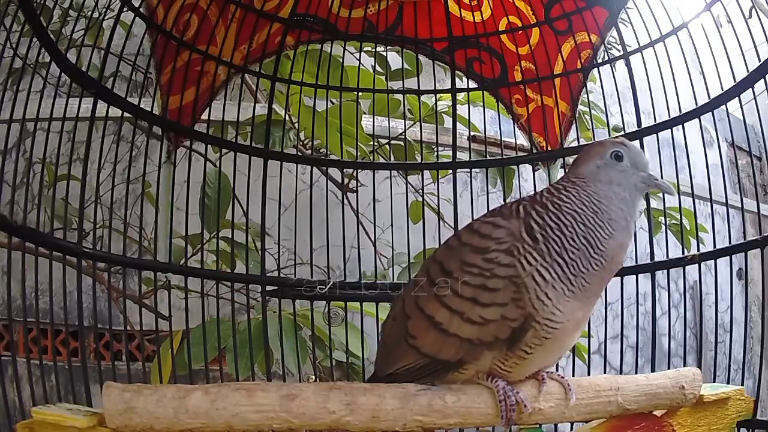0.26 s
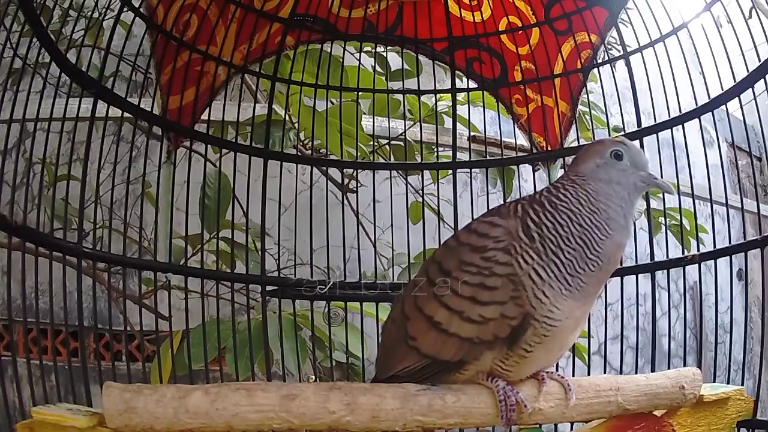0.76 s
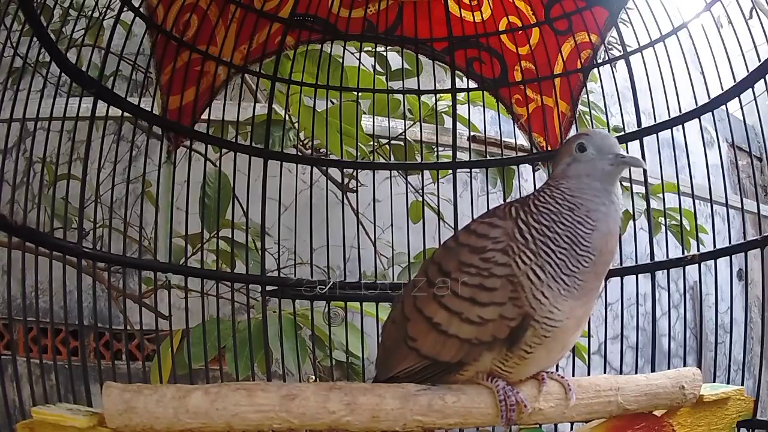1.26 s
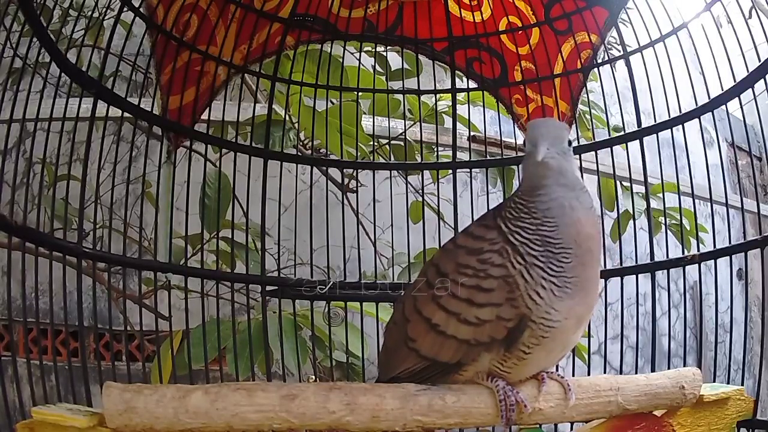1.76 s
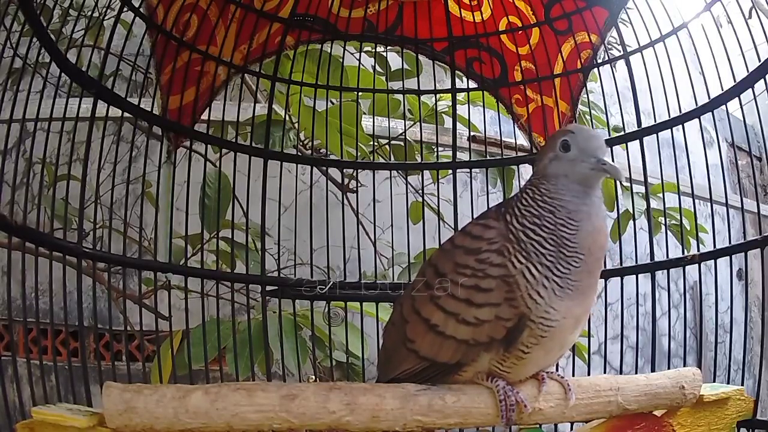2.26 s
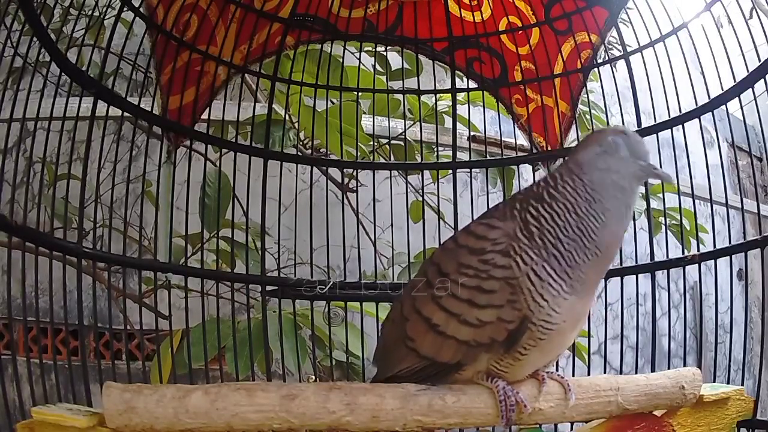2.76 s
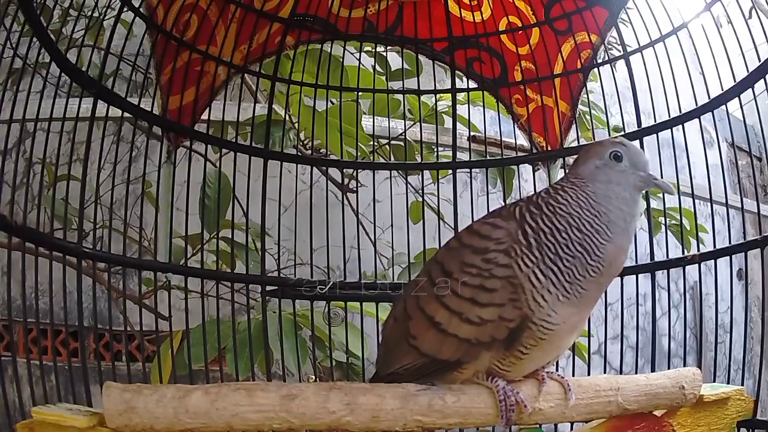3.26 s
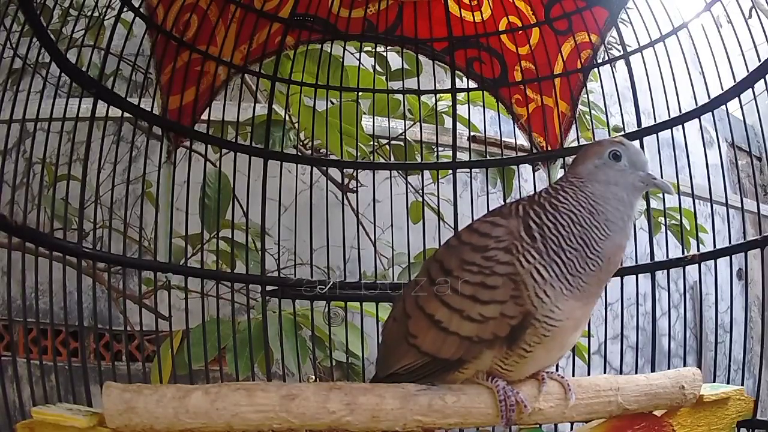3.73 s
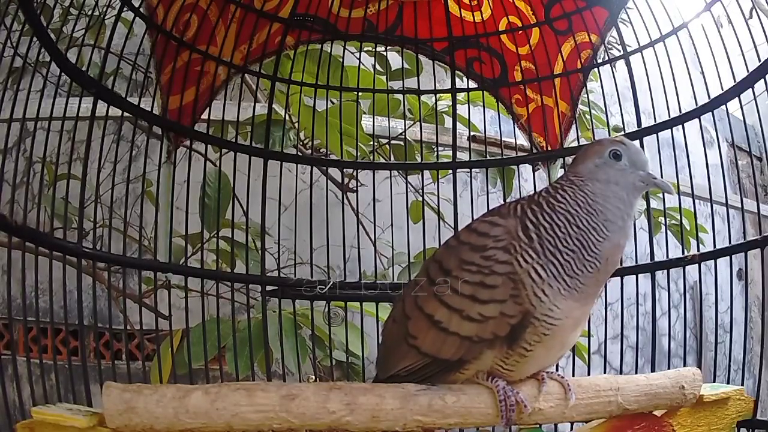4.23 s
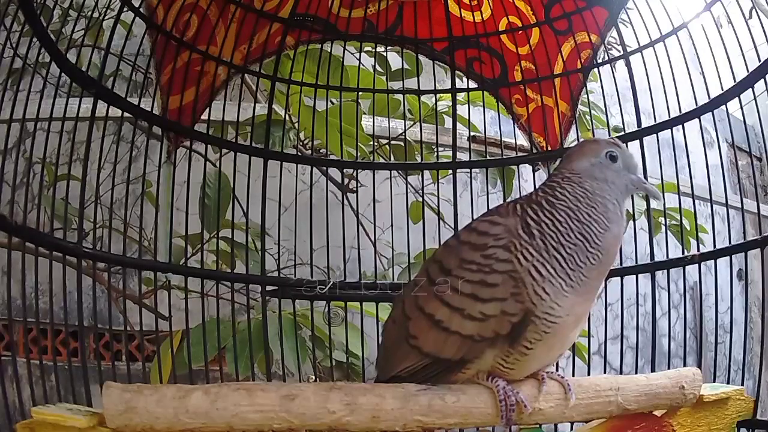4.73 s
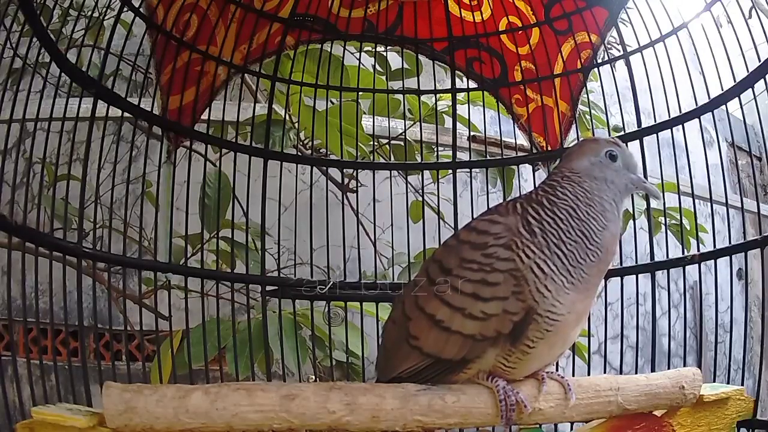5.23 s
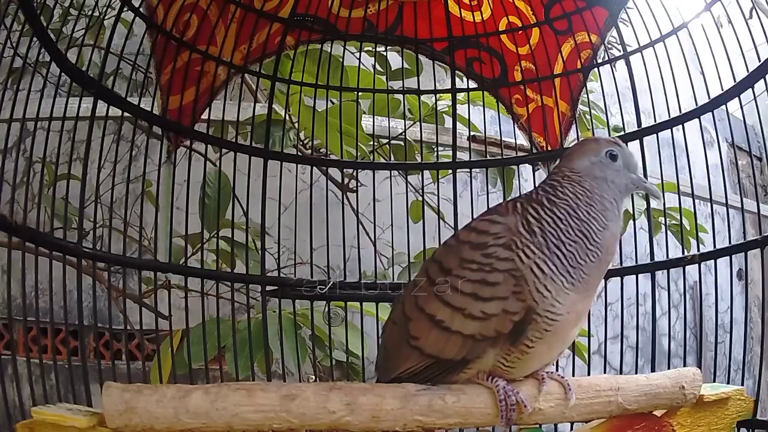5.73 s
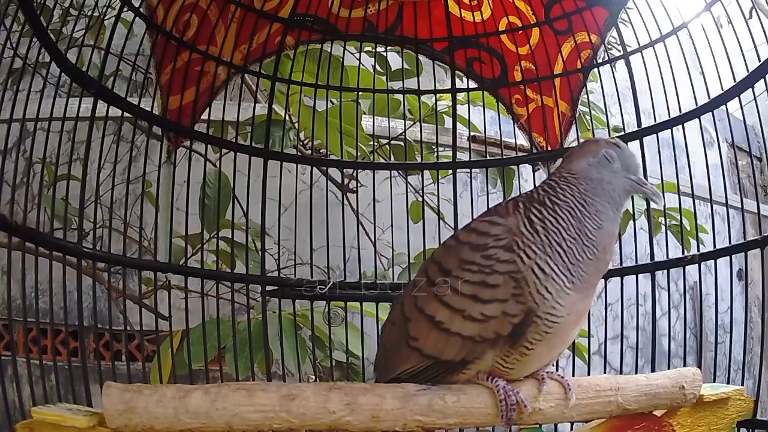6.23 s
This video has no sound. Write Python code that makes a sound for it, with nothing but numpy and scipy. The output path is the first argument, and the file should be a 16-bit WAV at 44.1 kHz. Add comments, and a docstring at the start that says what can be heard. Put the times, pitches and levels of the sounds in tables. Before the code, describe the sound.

A neighbouring dove coos quickly at once in a walled yard, over soft distant traffic. A sparrow gives thin buzzing chirps, and a purring trill breaks into slowing, sinking hoots. Then a close dove sings one loud phrase of six short, rounded whistles. Fainter doves answer, the trill rolls again more quietly, and the neighbour starts another note at the end. The near bird is loud and clear, close to the microphone, with faint wall echoes.

```python
"""Traffic drones and a neighbouring dove coos at once; a sparrow chirps, then a slowing trill rolls twice.
A near dove coos one loud phrase between the yard walls; a far dove answers.
Doves: creak pulses, a low gulp, then an arched whistle. Trill: pulsed purr and breath, then sine hoots.
Sparrow: three buzzing or fluttering sines, a thin high lead-in, an upper voice and a lower one.
Traffic: wavering noise bands plus engine tones. Each bird gets wall echoes and a diffuse noise tail."""
import sys
import numpy as np
from scipy import signal
from scipy.io import wavfile

SR = 44100
rng = np.random.default_rng(int(sys.argv[2]) if len(sys.argv) > 2 else 0)


def waveform_to_disk(signal):
    """Save audio, clipped to [-1, 1], as 16-bit WAV at the path in sys.argv[1]."""
    frames = np.transpose(np.atleast_2d(signal))
    scaled = np.clip(frames, -1, 1) * 32767
    samples = np.round(scaled).astype(np.int16)
    wavfile.write(sys.argv[1], SR, samples)


N = 286209

# Traffic noise spectrum, relative: (frequency [Hz], density [dB per Hz])
TRAFFIC_SPECTRUM = [(13, -42), (22, -15), (79, -12.5), (119, 1), (170, -17.5), (200, -6), (236, -20.5),
                    (285, -10), (374, -18.5), (740, -28), (972, -25), (1420, -39), (2200, -46), (4350, -59),
                    (14800, -60)]
# Stereo width of the traffic: (frequency [Hz], side over mid [dB])
TRAFFIC_WIDTH = [(60, -33), (180, -28.5), (540, -19.5), (1610, -8.5), (4810, -4), (14400, -11)]
# Two passing engines: (time [s], tone [Hz], level [dB])
PASSING_ENGINES = [
    [(0.4, 118, -47.5), (0.55, 134.8, -41.5), (0.8, 124, -41.5), (1.6, 116, -42), (2.7, 116.3, -43.5),
     (3.3, 126.9, -48.5)],
    [(4.2, 176.8, -42), (4.7, 190, -50), (5.05, 193.8, -42), (6.49, 210.6, -46)],
]
# Heavy engine slowing down: (time [s], firing rate [Hz], level [dB])
IDLING_ENGINE = [(3.2, 41.52, -51.5), (3.5, 40.2, -38.5), (4.7, 38.98, -39), (5.9, 35.1, -42),
                 (6.49, 34.39, -49)]
# Multiples 1, 2, 3 of the firing rate: (level [dB])
IDLING_ORDERS_DB = [-10, -6.5, -0.5]
TRAFFIC_DB = -41

# Yard as heard from each singer: echoes (lag [s], level [dB]),
# then diffuse tail (level [dB], build-up start [s], low t60 [s], high t60 [s], side level [dB])
NEAR_YARD = ([(.012, -20.5), (.045, -25), (.066, -28.5), (.105, -26.5), (.142, -28.5)],
              (-13.5, 0.08, 0.75, 0.27, -23.5))
NEIGHBOUR_YARD = ([(.007, 2.5), (.022, -7), (.035, -4)], (3.5, -0.52, 0.5, 0.27, -24.5))
TRILL_YARD = ([(.0125, -12.5), (.018, -2.5), (.0262, -4.5), (.0305, -5.5), (.037, -8.5), (.0435, -10.5),
               (.047, -6), (.055, -10.5), (.075, -10.5)], (-0.5, -0.33, 0.8, .5, -20))
FAR_YARD = ([(.011, -4), (.024, 0), (.041, -5)], (7.5, 0.07, 0.74, 0, -30.5))
SPARROW_YARD = ([(.009, -4), (.021, -8)], (4.5, -0.1, 0.82, 0.34, -5))
TAIL_SPLIT_HZ = 1230   # low t60 below, high t60 above

# Sparrow chirps: (start [s], peak [dB], upper voice [Hz], lower voice [Hz], length [s],
# lower voice [dB], lead-in [dB], settled buzz swing [Hz])
CHIRPS = [(0.584, -60, 4980, 4130, 0.08, 2, -19, 330), (0.764, -72, 4410, 3590, 0.068, -3, -20, 250),
          (1.353, -60, 4930, 3975, 0.079, 1.5, -12, 323), (2.233, -60, 4980, 4020, 0.084, 0, -14, 330),
          (3.512, -57.5, 4740, 3890, 0.091, 0.5, -18, 329), (3.876, -71, 4380, 3680, 0.063, 2, -20, 300),
          (4.455, -56.5, 4750, 3950, .095, 2.5, -18, 280), (5.393, -57.5, 4880, 3970, 0.094, 1, -21, 330.4),
          (6.22, -73, 4590, 3750, 0.045, 3, -20, 305)]
# Course of each chirp voice: (share of the length [1], pitch ratio [1], level [dB])
LEAD_IN = [(-.05, 1.44, -20), (.08, 1.4, 0), (.28, 1.36, -3), (.45, 1.3, -20)]
UPPER_VOICE = [(-.1, 1.12, -30), (.1, 1.04, -11), (.3, 1.01, 0), (.62, .98, 0), (.74, .94, -25)]
LOWER_VOICE = [(.46, 1.08, -25), (.58, 1.01, 2), (.78, .98, 0), (1.0, .89, -18)]
BUZZ_PER_S, FLUTTER_HZ = 480, 210

# Trills: (start [s], level of the purr [dB], hoot pitch [Hz], pitch sags from [s])
TRILLS = [(1.04, -5, 1020, 1.85), (5.008, -6.5, 973, 5.94)]
# Purr opening a trill: (time after start [s], hoot [dB], rasp in each of four bands [dB])
PURR = [(.015, -42.5, -71, -68, -63, -80.5), (.04, -31, -49, -44.5, -51, -75.5),
        (.11, -20, -47, -45.5, -47.5, -72), (.19, -12.5, -49, -48, -57, -59.5),
        (.27, -10.5, -54, -50, -55, -64), (.42, -14, -57.5, -51.5, -66, -63),
        (0.481, -24.5, -67.5, -67.5, -74.5, -76)]
# Breath through a half-open throat: (low edge [Hz], high edge [Hz])
RASP_BANDS_HZ = [(600, 910), (820, 1320), (1330, 1590), (1700, 1930)]
# Single hoots: (time [s], peak [dB])
HOOTS = [(1.3, -24.5), (1.346, -25), (1.503, -24.5), (1.579, -23), (1.658, -23), (1.757, -22.5),
         (1.85, -24.5), (1.952, -25), (2.048, -26), (2.112, -28), (2.222, -30), (2.285, -33.5),
         (5.309, -28.5), (5.455, -37), (5.497, -27), (5.561, -25.5), (5.622, -25), (5.708, -25),
         (5.76, -24.5), (5.872, -26), (5.954, -27), (6.014, -35.5), (6.118, -39)]
# Tones beside the hoot: (frequency [Hz], level before sagging [dB])
HOOT_SIDE_TONES = [(700, -26), (1450, -28), (1860, -34.5)]
PURR_PER_S, SAG_HZ_PER_S = 92, 230
HOOT_S, HOOT_SHORTENS_S_PER_S = .011, .0045   # shortening per s of sagging
HOOT_PITCH_SPREAD = .008
HOOT_HOARSER_DB_PER_S = 20.5   # side tones grow as the pitch sags

# Coo notes: (voice break [s], creak [s], gulp [s], gulp level [dB], arch [s], arch top [Hz], arch level [dB])
FAR_NOTES = [ (2.630, .015, .018, -37, 0.1, 1253, -53.5), (3.850, 0.026, .018, -38, 0.16, 1251, -52.5),
             (4.050, 0.009, .022, -39, 0.023, 1156, -73), (4.150, 0.015, .015, -44, 0.032, 1135, -55),
             (4.270, 0.0053, .015, -42.5, 0.028, 1193, -53), (5.980, .008, .015, -34, 0.19, 1280, -51.5),
             (6.225, 0.0068, .015, -40, 0.023, 1070, -58), (6.330, 0.011, .015, -56, 0.015, 1130, -69)]
NEIGHBOUR_NOTES = [ (0.004, .001, 0.004, -40, 0.062, 1310, -30),
                   (0.076, .001, 0.018, -60, 0.039, 1213, -35.5),
                   (0.104, 0.0026, 0.016, -31, 0.034, 1300, -38.5),
                   (0.186, 0.0037, 0.014, -25.5, 0.033, 1216, -36.5),
                   (0.278, 0.0064, 0.014, -25.5, 0.041, 1222, -36),
                   (0.397, 0.0036, .013, -25, 0.11, 1296, -37),
                   (3.280, 0.0021, 0.029, -32, 0.029, 1275, -38.5),
                   (6.436, 0.016, 0.024, -24, 0.078, 1349, -34.5)]
NEAR_NOTES = [ (2.787, 0.019, 0.028, -4, 0.096, 1306, -8.5), (2.901, 0.0028, 0.018, -3.5, 0.029, 1380, -15),
              (2.965, 0.012, 0.016, -3.5, 0.031, 1307, -15), (3.041, .013, 0.017, -5, 0.039, 1377, -10),
              (3.142, 0.018, .012, -3, .077, 1374, -9.5), (3.323, 0.017, 0.018, -3, 0.083, 1373, -11)]
# Multiples 1, 2, .. of the whistle, before flare and tilt: (level [dB])
OVERTONES_DB = [0, -39, -52, -64, -63, -65, -66, -72, -73]
# Last and first slap of a creak against the gulp: (level [dB])
CREAK_RAMP_DB = (-5, -12)
CREAK_OVERTONE_DB = -26
GULP_START, GULP_CLIMB, GULP_KICK = .8976, .16, .069   # pitch ratios; the kick comes just before the break
GULP_TILT_DB = -1.5             # per overtone: the gulp is duller than the whistle
BREAK_DB_PER_S = 2899           # overtones grow as the gulp nears the break
FLARE_LOSS_DB_PER_S = 149       # the longer a plain arch, the softer the overtones at its break
SNAP_S, SNAP_HZ = .0064, (1500, 5400)   # puff of noise as the voice breaks
OPENING_RISE_HZ, OPENING_RISE_SHARE, OPENING_END_RISE_HZ = 59.3, .055, 111
FALL_SHARE, FALL_LEAST_S = .1697, .011   # time constant of the fall: share of the arch, and its floor
WARBLE_HZ, WARBLE_LAG_S = 27, .004
OVERTONE_LOSS_DB_PER_HZ = .07   # overtones fade where the arch lies below its top
# Tick before the near phrase: (time [s], level [dB])
BEAK_TICK = (2.7232, -58)

CUTOFF_HZ = 15000


def amp(db):
    """Gain of a level in dB."""
    return 10 ** (np.asarray(db) / 20)


def rms_one(x):
    """Scaled to unit power."""
    return x / np.sqrt(np.mean(x ** 2) + 1e-20)


def tone(hz):
    """Sine whose phase accumulates a per-sample frequency."""
    return np.sin(2 * np.pi * np.cumsum(hz) / SR)


def in_time(rows):
    """Each column interpolated per sample, plus a gate with 20 ms fades inside the rows' span."""
    s, *columns = np.transpose(rows)
    t = np.arange(N) / SR
    gate = np.clip(np.minimum(t - s[0], s[-1] - t) / .02, 0, 1)
    return [np.interp(t, s, column) for column in columns] + [gate]


def at_hz(points, hz):
    """Read a table on a log-frequency axis."""
    table_hz, values = np.array(points).T[:2]
    return np.interp(np.log(hz), np.log(table_hz), values)


def drift(rate_hz):
    """Low-passed noise of unit RMS, computed every 40 samples and interpolated."""
    pole = np.exp(-80 * np.pi * rate_hz / SR)
    white = rng.standard_normal(N // 40 + 2002)
    slow = signal.lfilter([1], [1, -2 * pole, pole * pole], white)[2000:]   # settled part
    return np.interp(np.arange(N) / 40, np.arange(len(slow)), rms_one(slow))


def band(x, low_hz, high_hz):
    """Band-pass."""
    return signal.sosfilt(signal.butter(2, [low_hz, high_hz], "band", fs=SR, output="sos"), x)


def ridge(x, low_hz, high_hz):
    """A steep band of unit power."""
    return rms_one(band(band(x, low_hz, high_hz), low_hz, high_hz))


def puff(length_s, low_hz, high_hz):
    """A short burst of band noise."""
    size = round(length_s * SR)
    return ridge(rng.standard_normal(SR // 50), low_hz, high_hz)[-size:] * np.hanning(size)


def add(out, sound, s):
    """Mix a short sound in at time s."""
    at = round(s * SR)
    sound = sound[max(-at, 0):N - at]
    out[max(at, 0):max(at, 0) + len(sound)] += sound


def traffic():
    """Half-octave noise bands, nearly mono in the bass, each wavering, with engine tones on top."""
    out, edges_hz = 0, 20 * 2 ** np.arange(0, 10, .5)
    white = rng.standard_normal((2, 2, N))
    for k, (low_hz, high_hz) in enumerate(zip(edges_hz, edges_hz[1:])):
        mid, side = band(white[k % 2], low_hz, high_hz)
        hz = np.sqrt(low_hz * high_hz)
        waver_db = 0.93 * drift(7.7) + 1.1 * (hz < 500) * drift(0.73)
        gain = amp(at_hz(TRAFFIC_SPECTRUM, hz) + waver_db)
        out = out + gain * (mid + amp(at_hz(TRAFFIC_WIDTH, hz)) * side * [[1], [-1]])
    out = rms_one(out) * amp(TRAFFIC_DB + 0.07 * drift(0.71))
    for rows in PASSING_ENGINES:
        hz, db, on = in_time(rows)
        out = out + on * amp(db + 2.0 * drift(5)) * tone(hz)
    return out + idling_engine()


def idling_engine():
    """Multiples of a sinking firing rate, each wavering in level."""
    hz, db, on = in_time(IDLING_ENGINE)
    return on * sum(amp(db + order_db + 0.47 * drift(5.6)) * tone(order * hz)
                    for order, order_db in enumerate(IDLING_ORDERS_DB, 1))


def yard(x, echoes, tail, pan_db):
    """Direct sound, a few wall echoes and a diffuse noise tail with separate low and high decays."""
    tail_db, start_s, low_t60_s, high_t60_s, side_db = tail
    t = np.arange(SR // 2) / SR
    white = rng.standard_normal((2, len(t)))
    low = signal.sosfiltfilt(signal.butter(2, TAIL_SPLIT_HZ, fs=SR, output="sos"), white)
    decaying = low * amp(-60 * t / low_t60_s) + (white - low) * amp(-60 * t / high_t60_s)
    build_up = 1 - np.exp(-np.maximum(t - start_s, 0) / 0.0034)
    mid, side = decaying * build_up
    scale = amp(tail_db) / np.sqrt(SR * low_t60_s / np.log(1e6))
    response = scale * (mid + amp(side_db) * side * np.array([[1], [-1]]))
    response[:, 0] = 1   # direct sound
    for lag_s, db in echoes:
        response[:, round(lag_s * SR)] += amp(db)
    return signal.fftconvolve(x[None], response)[:, :N] * amp([[pan_db / 2], [-pan_db / 2]])


def dull(x):
    """Walls and leaves take the treble off the farther doves."""
    return signal.sosfilt(signal.butter(4, 2900, fs=SR, output="sos"), x)


def sparrow():
    """Thin lead-in, buzzing upper voice, purer sinking lower one; each chirp rings in its own noise tail."""
    out, first_share = 0, UPPER_VOICE[0][0]
    for start_s, peak_db, upper_hz, lower_hz, length_s, lower_db, lead_db, swing_hz in CHIRPS:
        chirp, t = np.zeros(N), np.arange(round(1.1 * length_s * SR)) / SR
        flutter = FLUTTER_HZ * rms_one(band(rng.standard_normal(SR // 5), 90, 320))[:len(t)]
        swing = swing_hz + 900 * np.exp(-t / 0.017)   # widest at the onset
        buzz = swing * tone(BUZZ_PER_S + flutter / 2) + flutter
        voices = ((LEAD_IN, upper_hz, flutter, lead_db),
                  (UPPER_VOICE, upper_hz, buzz, 0),
                  (LOWER_VOICE, lower_hz, .8 * flutter, lower_db))
        for rows, hz, waver_hz, voice_db in voices:
            share, ratio, db = np.transpose(rows)
            at = t / length_s + first_share
            level = amp(peak_db + voice_db + np.interp(at, share, db, left=-99, right=-99))
            pitch_hz = hz * np.interp(at, share, ratio) + waver_hz
            add(chirp, level * tone(pitch_hz), start_s + first_share * length_s)
        out = out + yard(chirp, *SPARROW_YARD, pan_db=1.3)
    return out


def purr():
    """Dense pulses ring a narrow band at the hoot pitch, over rasping bands of breath."""
    out = np.zeros(N)
    turns = np.cumsum(PURR_PER_S * amp(1.5 * drift(30.04)) / SR)
    pulses = rms_one(np.diff(np.floor(turns), prepend=0) * amp(1.8 * drift(90)))   # one per turn
    breath = rng.standard_normal(N) * amp(1.3 * drift(80))
    rasp = [ridge(breath, *edges_hz) for edges_hz in RASP_BANDS_HZ]
    for start_s, db, hz, _ in TRILLS:
        hoot_db, *rasp_db, on = in_time(np.array(PURR) + [start_s, db, db, db, db, db])
        ringing = band(on * pulses + 1e-18, hz - 75, hz + 75)
        out += amp(hoot_db) * band(ringing, 530, 1400)
        out += on * sum(amp(level_db) * part for level_db, part in zip(rasp_db, rasp))
    return out


def trill():
    """The purr, then single sine hoots that sink in pitch, shorten and grow hoarser."""
    out = purr()
    for s, db in HOOTS:
        _, _, held_hz, sags_from_s = [row for row in TRILLS if row[0] < s][-1]
        sagging_s = max(s - sags_from_s, 0)
        hz = (held_hz - SAG_HZ_PER_S * sagging_s) * rng.normal(1, HOOT_PITCH_SPREAD)
        length_s = HOOT_S - HOOT_SHORTENS_S_PER_S * sagging_s
        t = np.arange(round(length_s * SR)) / SR
        swell = np.sin(np.pi * t / length_s) ** 2
        side = sum(amp(side_db + HOOT_HOARSER_DB_PER_S * sagging_s) * np.sin(2 * np.pi * side_hz * t)
                   for side_hz, side_db in HOOT_SIDE_TONES)
        add(out, amp(db) * swell * (np.sin(2 * np.pi * hz * t) + side * swell ** 2), s - .004)
    return out


def beak():
    """A dry tick with a duller knock under it."""
    out, (s, db) = np.zeros(N), BEAK_TICK
    add(out, amp(db) * (puff(.002, 5800, 9500) + amp(12) * puff(.002, 900, 1700)), s - .001)
    return out


def voice(hz, level, flare_db, tilt_db=0):
    """A near sine on the pitch, with overtones shifted by the flare."""
    phase = 2 * np.pi * np.cumsum(hz) / SR
    return level * sum(amp(db + (k > 0) * (flare_db + tilt_db * (k - 1.5))) * np.sin((k + 1) * phase)
                       for k, db in enumerate(OVERTONES_DB))


def creak(out, end_s, creak_s, level_db):
    """The membranes slap a few times before they sing: short, uneven tone pulses, growing louder."""
    t = np.arange(round(.0045 * SR)) / SR
    for before_s in np.arange(0, creak_s, .0032):
        hz, db, late_s = rng.normal([1000, 0, 0], [120, 2, .0006])
        turn = 2 * np.pi * hz * t
        slap = (np.sin(turn) + amp(CREAK_OVERTONE_DB) * np.sin(2 * turn)) * np.hanning(len(t)) ** 2
        ramp_db = np.interp(before_s, [0, creak_s], CREAK_RAMP_DB)
        add(out, amp(level_db + ramp_db + db) * slap, end_s - before_s + late_s)


def gulp(gulp_s, gulp_hz, gulp_db, at_break_db):
    """Low swelling note, climbing in pitch and gaining overtones toward the break."""
    u = np.linspace(0, 1, round(gulp_s * SR))
    swell = np.sin(np.pi / 2 * np.clip(np.minimum(u / .55, (1 - u) / .3), 0, 1)) ** 2
    hz = gulp_hz * (GULP_START + GULP_CLIMB * u + GULP_KICK * u ** 4)
    flare_db = at_break_db - BREAK_DB_PER_S * gulp_s * (1 - u)
    return voice(hz, amp(gulp_db) * swell, flare_db, GULP_TILT_DB)


def arch(t, arch_s, top_hz, climb_hz, climb_share, fall_hz, warble, pitch_waver,
         arch_db, level_waver, overtones_db):
    """Whistle that climbs fast, holds and falls along exponentials."""
    u = t / arch_s
    climb = climb_hz * np.exp(-u / climb_share)
    fall = fall_hz * np.exp((t - arch_s) / max(FALL_LEAST_S, FALL_SHARE * arch_s))
    hz = top_hz - climb - fall + warble + pitch_waver
    db = arch_db - 5 * (1 - u) ** 3 + 0.028 * warble + level_waver
    edges = np.sin(np.pi / 2 * np.clip(np.minimum(t / 0.0045, (arch_s - t) / 0.0092), 0, 1)) ** 2
    loss_db = OVERTONE_LOSS_DB_PER_HZ * np.maximum(top_hz - 30 - hz, 0)
    return voice(hz, amp(db) * edges, overtones_db - loss_db)


def dove(notes, gulp_hz, end_hz, warble_hz, flare_db, arch_overtones_db, creak_db, waver_db, waver_hz,
         rise_hz, rise_share, snap_db, opening_s):
    """Coo notes: creak, gulp, a snap of noise as the voice breaks, then the arched whistle."""
    out = np.zeros(N)
    pitch_waver, level_waver = waver_hz * drift(58), waver_db * drift(36)
    for s, creak_s, gulp_s, gulp_db, arch_s, top_hz, arch_db in notes:
        opening = arch_s > opening_s   # long arches open a phrase: they warble, flare more and end higher
        creak(out, s - .8 * gulp_s, creak_s, gulp_db + creak_db)
        at_break_db = flare_db - FLARE_LOSS_DB_PER_S * arch_s * (not opening)
        add(out, amp(gulp_db + at_break_db + snap_db) * puff(SNAP_S, *SNAP_HZ), s - .8 * SNAP_S)
        add(out, gulp(gulp_s, gulp_hz, gulp_db, at_break_db), s - gulp_s + .0015)
        t = np.arange(round(arch_s * SR)) / SR
        here = np.minimum(round(s * SR) + np.arange(len(t)), N - 1)
        climb = (OPENING_RISE_HZ, OPENING_RISE_SHARE) if opening else (rise_hz, rise_share)
        fall_hz = top_hz - end_hz - opening * OPENING_END_RISE_HZ
        warble_in = np.clip(t / 0.012 - 1, 0, 1)   # fades in from 12 to 24 ms
        warble = opening * warble_hz * warble_in * np.cos(2 * np.pi * WARBLE_HZ * (t - WARBLE_LAG_S))
        whistle = arch(t, arch_s, top_hz, *climb, fall_hz, warble, pitch_waver[here],
                       arch_db, level_waver[here], arch_overtones_db)
        add(out, whistle, s - .003)
    return out


def scene():
    """All singers at their places in the yard, over the street."""
    near = dove(NEAR_NOTES, gulp_hz=1004.5, end_hz=1006, warble_hz=59.5, flare_db=24.5,
                arch_overtones_db=-1.5, creak_db=-5.0, waver_db=0.63, waver_hz=5.4,
                rise_hz=229.6, rise_share=0.13, snap_db=-65.5, opening_s=.09) + beak()
    neighbour = dove(NEIGHBOUR_NOTES, gulp_hz=963, end_hz=980, warble_hz=35.3, flare_db=7.0,
                     arch_overtones_db=9, creak_db=-7.0, waver_db=-1.0, waver_hz=15.2,
                     rise_hz=260.5, rise_share=.13, snap_db=-80.5, opening_s=.2)
    far = dove(FAR_NOTES, gulp_hz=876.5, end_hz=945, warble_hz=21, flare_db=2.5,
               arch_overtones_db=14, creak_db=-1.0, waver_db=5.0, waver_hz=23,
               rise_hz=174, rise_share=0.11, snap_db=-80, opening_s=.08)
    return (yard(near, *NEAR_YARD, pan_db=1.5)
            + yard(dull(neighbour), *NEIGHBOUR_YARD, pan_db=1.7)
            + yard(dull(far), *FAR_YARD, pan_db=1.1)
            + yard(trill(), *TRILL_YARD, pan_db=1.0)
            + sparrow() + traffic())


def record(dry):
    """The microphone drops the deepest bass and softens the highest treble; the top is cut."""
    bassless = signal.sosfilt(signal.butter(3, 32, "high", fs=SR, output="sos"), dry)
    soft = signal.sosfilt(signal.butter(2, 12000, fs=SR, output="sos"), bassless)
    return signal.sosfilt(signal.ellip(10, .5, 60, CUTOFF_HZ, fs=SR, output="sos"), soft)


dry = scene()
out = record(dry)
waveform_to_disk(out)
```